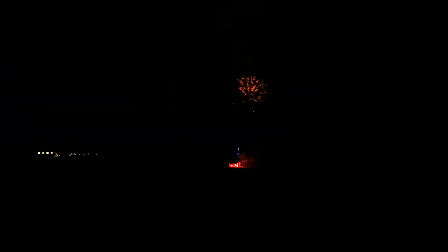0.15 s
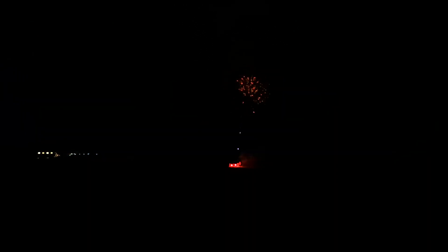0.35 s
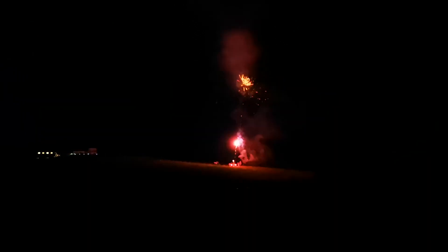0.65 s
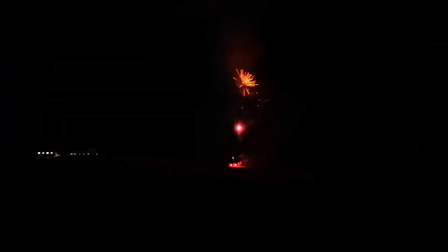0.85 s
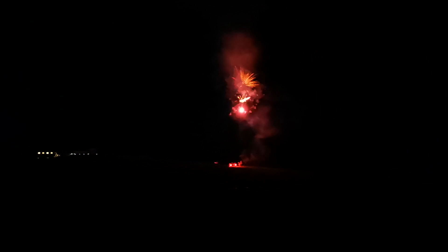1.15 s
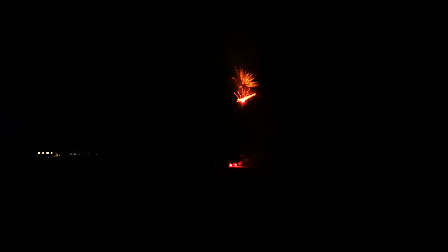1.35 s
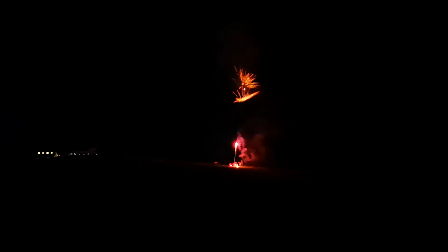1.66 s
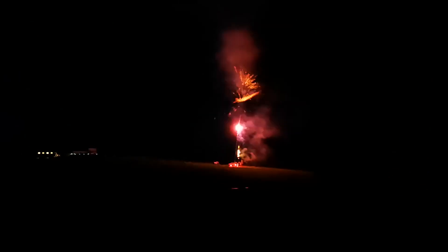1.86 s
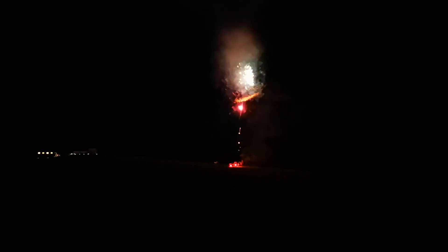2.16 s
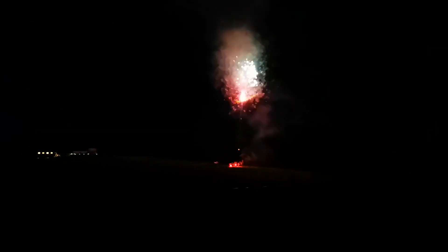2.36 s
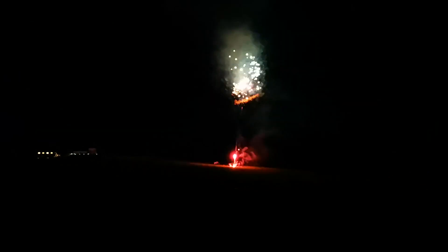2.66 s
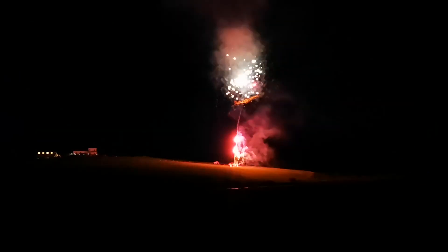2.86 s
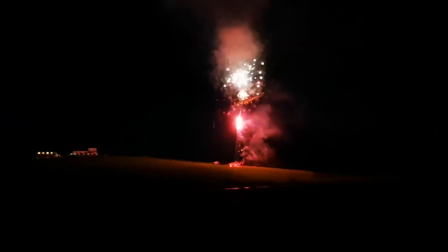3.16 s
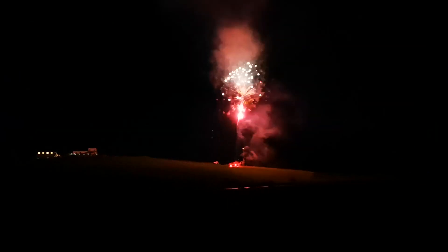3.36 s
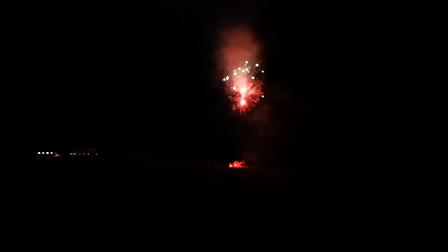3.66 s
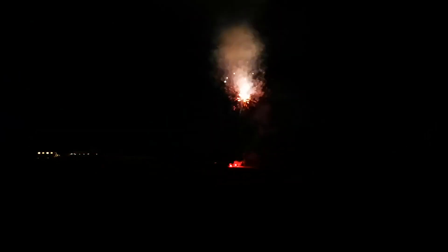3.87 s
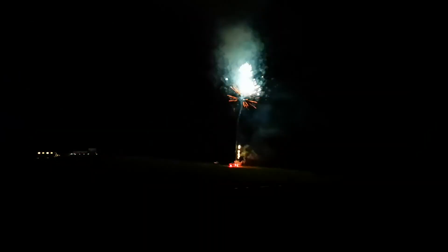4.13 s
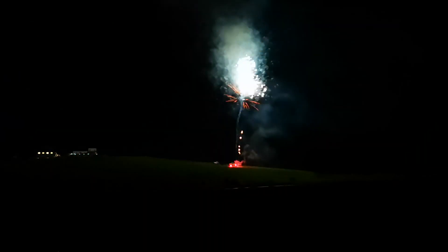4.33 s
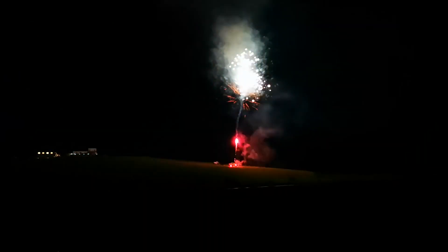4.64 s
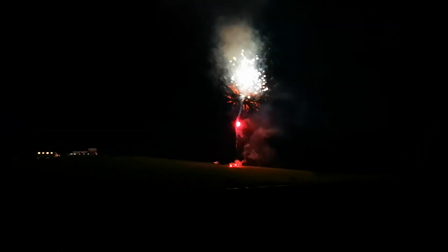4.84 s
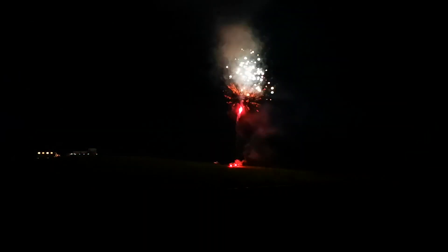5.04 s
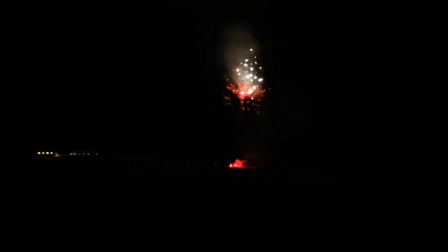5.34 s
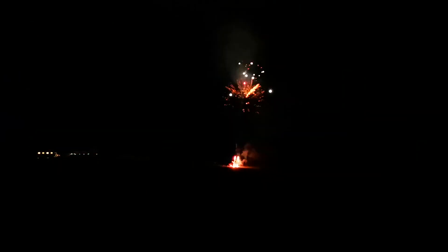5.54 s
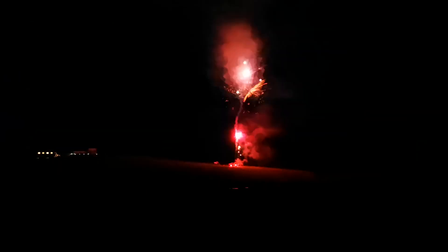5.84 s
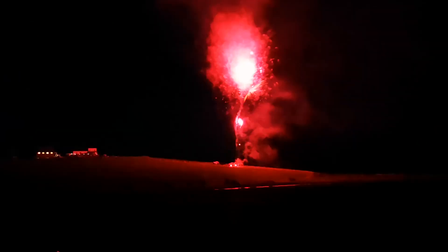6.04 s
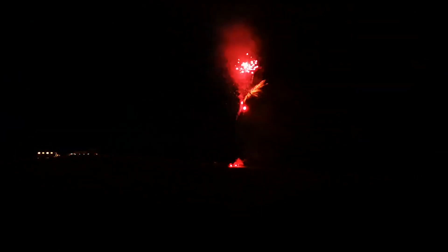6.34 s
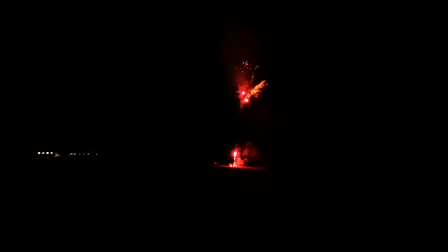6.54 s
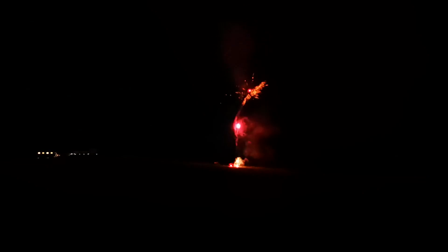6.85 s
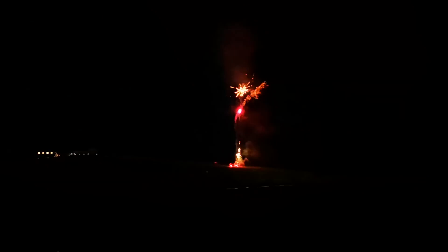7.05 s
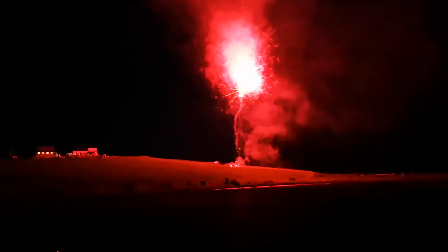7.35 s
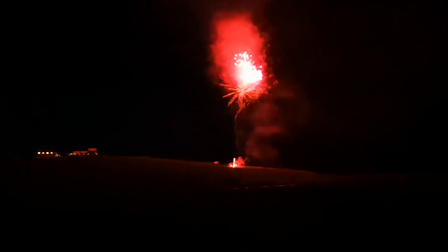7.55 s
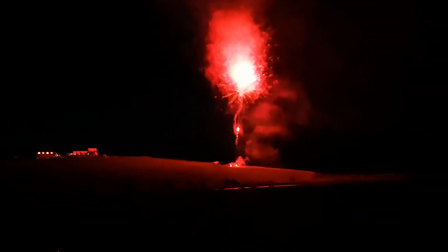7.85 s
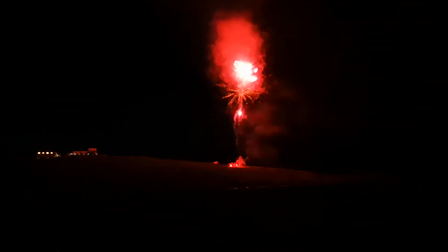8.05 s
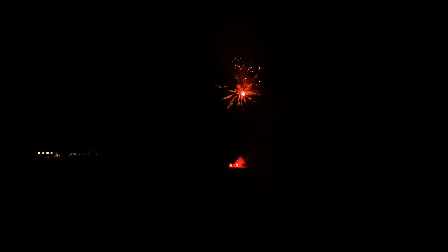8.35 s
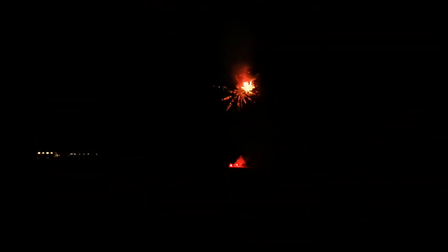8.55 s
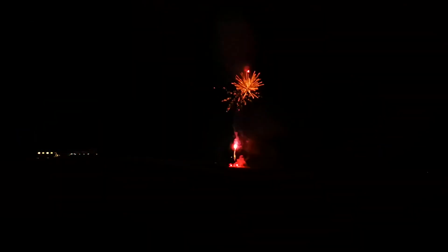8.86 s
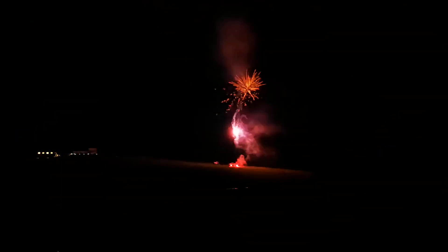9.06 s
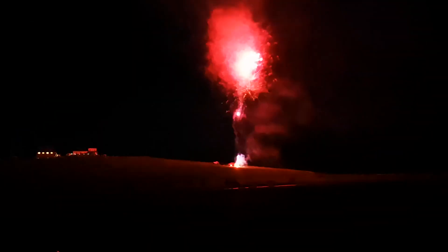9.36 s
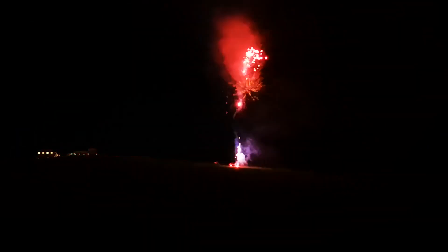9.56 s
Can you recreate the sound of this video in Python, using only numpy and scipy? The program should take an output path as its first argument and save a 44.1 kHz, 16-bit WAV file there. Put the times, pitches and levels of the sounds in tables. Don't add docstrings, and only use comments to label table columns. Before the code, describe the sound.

Irregular hard firework bangs, with short hollow launch thumps between them, ring off trees and far slopes above faint crickets and low night rumble.

```python
import sys
import numpy as np
from scipy import signal
from scipy.io import wavfile

SR = 44100
rng = np.random.default_rng(int(sys.argv[2]) if len(sys.argv) > 2 else 0)


def rack_gain(trim_db):
    fader = np.asarray(trim_db, float)
    return 10 ** (fader / 20)


def file_out(sig):
    cols = np.atleast_2d(sig).T
    lim = np.clip(cols, -1, 1)
    pcm = np.round(lim * 32767).astype(np.int16)
    wavfile.write(sys.argv[1], SR, pcm)


N = 427769
RUN_IN = 3 * SR // 2

# (frequency [Hz], density [dB per Hz])
NIGHT_AIR = [(60, 1.5), (193, -14), (266, -11), (585, -10), (846, -20), (5500, -34.5), (8500, -40),
             (12000, -85)]
# (time [s], level [dB])
CRICKET_CHIRPS = [(-.06, -83), (.257, -80), (.609, -80), (.953, -74.5), (9.01, -77)]
# (time [s], thump [dB], crack [dB], crack ring [Hz], upper ring [dB])
LIFT_CHARGES = [(0.8177, -19.5, -13, 1380, 1), (1.2229, -21, -12, 1490, -5.5),
                (2.277, -15.5, -8.5, 1810, -12), (2.4819, -24, -14.5, 1670, 1.5),
                (3.3798, -22, -17.5, 1532, 2), (3.4781, -16, -13, 1580, -12.5),
                (3.5132, -19, -8.0, 1450, -1), (3.5436, -19, -11.5, 1500, -14),
                (5.2144, -16, -14.5, 1590, -3.5), (6.268, -26, -11.5, 1780, 3),
                (6.297, -20, -12.5, 1530, -4.5), (6.3422, -15.5, -11, 1530, 7),
                (7.2527, -20, -10.5, 1660, 3), (7.6165, -20.5, -14, 1690, 9.5),
                (8.3203, -15, -10.5, 1580, -3.5), (9.4508, -21, -9, 1630, -4.5)]
# (frequency [Hz], level [dB], t60 [s])
TUBE_MODES = [(112, -0.5, 0.044), (53.5, -5.0, 0.073), (108, -15, 0.12)]
# (lag [s], level [dB])
MUZZLE_SLAPS = [
    (.0100, -15),
    (.026, -18.5),
    (0.036, -22),
]
# (time [s], peak [dB], spike width [ms], ground bounce lag [ms], bounce [dB])
SHELL_BURSTS = [(1.2788, -2.3, 0.15, 4.04, -14), (1.8354, -1.5, 0.23, 3.67, -10),
                (2.7283, -1.5, 0.14, 4.52, -15), (3.2824, -0.9, 0.33, 3.71, -9),
                (3.908, -1, 0.19, 3.67, -11.5), (4.6051, -2, 0.17, 3.5, -14.5),
                (4.6733, -4, 0.23, 3.93, -8), (4.7646, -1.5, 0.15, 4.15, -12),
                (5.0568, -0.5, 0.18, 3.76, -11), (6.1302, -2, 0.26, 3.72, -8.5),
                (6.6161, -0.2, 0.18, 4.15, -13), (7.7504, 5, 0.19, 3.87, -8),
                (7.8819, 0.3, 0.18, 4.24, -13.5), (7.9787, -2.2, 0.15, 3.98, -12),
                (8.461, 4.5, 0.14, 4.2, -14), (9.2487, -2, 0.21, 3.8, -8.5)]
# (time [s], strength [dB])
EARLIER_BURSTS = [
    (-1.3, -35.5),
    (-0.91, -40),
]

# (time after bang [s], spread [s], return lift [dB], left-right [dB])
FIELD_REFLECTORS = [
    (0.015, 0.0011, 0, 8.5),
    (0.039, 0.0052, 4, 0),
    (0.141, 0.012, 5, -2),
    (.2, 0.002, 5.5, -1),
    (.3, .05, -1, -3),
    (0.422, 0.038, 1.5, 0),
]
# (frequency [Hz], level [dB], t60 [s])
NEAR_SCATTER = [(66.6, 2, 0.45), (280, 10, 0.32), (926, 10.5, 0.12), (1470, -3, 0.11), (2170, -2.5, 0.13),
                (3370, -7, 0.16), (8800, -19, 0.28), (12700, -43, .07)]
TREE_LINE = [(100, -14.5, 1), (293, -12.5, 0.88), (620, -7, 0.37), (970, -21.5, .94), (1400, -24, 1),
             (3056, -27, 1), (7600, -27.5, 1), (10400, -39.5, 0.4)]
FAR_SLOPES = [(96, -34.5, 2.8), (300, -19.5, 11.2), (860, -15, 6.8), (1314, -26, 4.2), (2140, -23.5, 4.3),
              (4520, -32.5, 2.4), (7600, -43.5, 3.6), (12800, -86, 1.2)]
# (frequency [Hz], left-right [dB])
FAR_BALANCE = [(60, 7), (150, -4.5), (380, 3), (950, 5), (2380, 2.5), (5980, 8), (15000, -11)]
# (frequency [Hz], left-right correlation [-1..1])
PORT_LIKENESS = [(40, .995), (100, .995), (215, .93), (300, .2), (450, -.45), (700, -.65), (1200, -.05),
                 (2000, 0)]
# (frequency [Hz], width [Hz], level [dB])
PORT_RINGS = [(1680, 300, -2.5), (1750, 500, -6.0)]
# (frequency [Hz], width [Hz], left-right [dB])
HOUSING_SHADE = [(2000, 400, 7), (2620, 450, -8), (3700, 700, 5), (5300, 600, -6), (7200, 1500, 12),
                 (11000, 3000, -5)]
# (frequency [Hz], width [Hz], level [dB], boost or cut [signed gain])
EQUALISER = [(1490, 2850, -5, 0.77), (2850, 210, -19, 0.72), (7750, 340, -8, 1), (556, 270, -5.5, -0.81)]


def at_hz(points, hz):
    freq, *columns = np.transpose(points)
    return [np.interp(np.log(hz), np.log(freq), c) for c in columns]


def rms_one(x):
    return x / np.sqrt(np.mean(x ** 2) + 1e-20)


def drift(rate_hz, size):
    r = np.exp(-80 * np.pi * rate_hz / SR)
    slow = signal.lfilter([1], [1, -2 * r, r * r], rng.standard_normal(size // 40 + 2002))[2000:]
    return np.interp(np.arange(size) / 40, np.arange(len(slow)), rms_one(slow))


def resonate(x, hz, width_hz):
    r = np.exp(-np.pi * width_hz / SR)
    zeros = np.array([1, 0, -1]) * (1 - r * r) / 2
    return signal.lfilter(zeros, [1, -2 * r * np.cos(2 * np.pi * hz / SR), r * r], x)


def cut(x, hz, kind, order=2):
    return signal.sosfilt(signal.butter(order, hz, kind, fs=SR, output="sos"), x)


def add(out, time_s, x):
    i = round(time_s * SR) + RUN_IN
    out[..., i:i + x.shape[-1]] += x[..., :out.shape[-1] - i]


def bands(size, density=1):
    edges_hz = 25 * 2 ** np.arange(0, 9.5, .4)
    white = rng.standard_normal((2, 2, size + 4000))
    white = white * (rng.random(size + 4000) < density) / np.sqrt(density)
    for k, (low, high) in enumerate(zip(edges_hz, edges_hz[1:])):
        mid, side = cut(white[k % 2], [low, high], "band")[:, 4000:]
        hz = np.sqrt(low * high)
        alike = np.clip(at_hz(PORT_LIKENESS, hz)[0], -1, 1)
        yield hz, np.sqrt(1 + alike) * mid + np.sqrt(1 - alike) * side * [[1], [-1]]


def strength(peak_db, width_ms, lag_ms):
    return -35.5 + 19 * (width_ms - .18) + 0.25 * peak_db - 3 * (lag_ms - 3.9)


def field(seconds, trees_db, far_db):
    trees_start_s, trees_end_s = 0.063, 0.095
    t = np.arange(round(seconds * SR)) / SR
    sides = np.array([[1], [-1]])
    lumps = rack_gain(0.75 * drift(32, len(t))) * np.ones((2, 1))
    for lag_s, spread_s, lift_db, pan_db in FIELD_REFLECTORS:
        lumps = lumps * rack_gain(np.exp(-((t - lag_s) / spread_s) ** 2) * (lift_db + pan_db / 2 * sides))
    rise = np.clip(t / trees_start_s, 0, 1) ** 2
    density = np.clip(.12 + 3 * np.arange(-4000, len(t)) / SR, .12, 1)
    out = 0
    for hz, noise in bands(len(t), density):
        near, near_t60 = at_hz(NEAR_SCATTER, hz)
        trees, trees_t60 = at_hz(TREE_LINE, hz)
        far, far_t60 = at_hz(FAR_SLOPES, hz)
        left_db = at_hz(FAR_BALANCE, hz)[0] / 2 * sides
        power = np.clip(t / 0.0011, 0, 1) * rack_gain(2 * (near - 60 * t / near_t60))
        power = power + rise * rack_gain(2 * (trees + trees_db - 60 * np.maximum(t - trees_end_s, 0) / trees_t60))
        power = power + rise * rack_gain(2 * (far + far_db + left_db - 60 * t / far_t60))
        out = out + noise * np.sqrt(power) * rack_gain(3.0 * drift(10, len(t)))
    return out * lumps * np.clip((seconds - t) / 0.37, 0, 1)


def night():
    air_db, rest_db, burst_db, lift_db = -62 - 1.5, -64.5, -19, -41
    rise_s, t60_s = 0.11, 2.5
    air = sum(rack_gain(at_hz(NIGHT_AIR, hz)[0] + 0.64 * drift(3.2, N)) * noise for hz, noise in bands(N))
    bangs = [(row[0], strength(*row[1:4]) + burst_db) for row in SHELL_BURSTS]
    bangs += [(row[0], row[1] + lift_db) for row in LIFT_CHARGES]
    power = rack_gain(2 * rest_db)
    for time_s, db in bangs:
        since_s = np.maximum(np.arange(N) / SR - time_s, 0)
        power = power + (1 - np.exp(-since_s / rise_s)) * rack_gain(2 * (db - 60 * since_s / t60_s))
    rumble = rms_one(resonate(cut(rng.standard_normal(N), 152, "low"), 64, 19))
    return rack_gain(air_db) * rms_one(air) + np.sqrt(power) * rack_gain(2.4 * drift(3.5, N)) * rumble


def crickets():
    out = np.zeros(N + RUN_IN)
    t = np.arange(round(.1 * SR)) / SR
    pulses = np.clip(np.sin(2 * np.pi * 80.5 * t) + .3, 0, 1)
    pulses = pulses * np.clip(t / .025 + .3, 0, 1) * np.clip((.087 - t) / .006, 0, 1)
    for time_s, db in CRICKET_CHIRPS:
        wander_rad = np.cumsum(rng.normal(0, 0.059, len(t)))
        add(out, time_s, rack_gain(db + 2.0) * pulses * np.sin(2 * np.pi * 7180 * t + wander_rad))
    chorus = resonate(resonate(rng.standard_normal((2, N + RUN_IN)), 5260, 600), 5260, 650)
    chorus = rack_gain(-83 + 1.5 * drift(70, N + RUN_IN)) * rms_one(chorus)
    return out * rack_gain([[2.5], [-2.5]]) + chorus


def tube_boom():
    t = np.arange(6000) / SR
    boom = 0
    for k, (hz, db, t60_s) in enumerate(TUBE_MODES):
        boom = boom + (-1) ** k * rack_gain(db - 60 * t / t60_s) * np.sin(2 * np.pi * hz * t)
    return cut(boom * (1 - np.exp(-t / 0.0019)), 155, "low", order=3)


def muzzle_crack(crack_db, ring_hz, upper_db):
    draw = rng.standard_normal((3, 1500))
    jet = (draw[0] + 0.48 * draw[1:]) * rack_gain(-60 * np.arange(1500) / SR / 0.019)
    jet[:, 2] += 10.0
    third_hz = 2080 if ring_hz < 1800 else 1480
    ring = rms_one(resonate(jet, ring_hz, 280))
    ring = ring + rack_gain(upper_db) * rms_one(resonate(jet, 2840, 320))
    ring = ring + rack_gain(-8.0) * rms_one(resonate(jet, third_hz, 140))
    ring = ring + rack_gain(-6.5) * rms_one(cut(jet, 3800, "high"))
    ring[:, :8] += rack_gain(5.5) * np.hanning(8)
    ring = cut(cut(ring, 1300, "high", order=3), 8030, "low", order=10)
    return rack_gain(crack_db - 4.5) * ring / np.abs(ring).max()


def lifts():
    boom_lead_s = .0032
    booms, fronts = np.zeros(N + RUN_IN), np.zeros(N + RUN_IN)
    cracks = np.zeros((2, N + RUN_IN))
    boom = tube_boom()
    for time_s, thump_db, crack_db, ring_hz, upper_db in LIFT_CHARGES:
        add(booms, time_s - boom_lead_s, rack_gain(thump_db + 4.0) * boom)
        crack = muzzle_crack(crack_db, ring_hz, upper_db)
        add(cracks, time_s - 2e-4, crack)
        add(fronts, time_s, rack_gain([crack_db]))
        chances_db = rng.normal(0, 2.5, (len(MUZZLE_SLAPS), 2, 1))
        for (lag_s, slap_db), chance_db in zip(MUZZLE_SLAPS, chances_db):
            slap = rack_gain(slap_db + chance_db) * cut(crack, 3500 - 40000 * lag_s, "low", order=3)
            add(cracks, time_s + lag_s * rack_gain(chance_db[0, 0] / 5), slap)
    sent = rack_gain(-54.5) * booms + rack_gain(-48) * cracks + rack_gain(-22) * cut(fronts, [1200, 3800], "band")
    wet = signal.fftconvolve(sent, field(0.94, -4.0, -12.0), axes=1)[:, :N + RUN_IN]
    puff = rack_gain(11) * cut(fronts, [190, 480], "band")
    return booms + cracks + puff + wet


def blast(width_ms):
    t = np.arange(600) / SR
    x = t / (0.0034 * width_ms)
    slow = t / 0.0019
    suction = rack_gain(-14.0) * slow ** 2 * np.exp(-2 * slow) * (2.6 - slow)
    return (1 - x) * np.exp(-1.3 * x) - suction


def bursts():
    out, clicks = np.zeros((2, N + RUN_IN)), np.zeros((2, N + RUN_IN))
    fade = rack_gain(-60 * np.arange(900) / SR / 0.02)
    sources = []
    for time_s, peak_db, width_ms, lag_ms, bounce_db in SHELL_BURSTS:
        wave = blast(width_ms)
        strength_db = strength(peak_db, width_ms, lag_ms)
        sources.append((time_s, strength_db))
        over_db = max(0, 0.29 * (strength_db + 45.0))
        direct = cut(wave, 7950 * (0.24 / width_ms) ** 0.72, "low", order=4)
        add(out, time_s - 2.5e-4, rack_gain(peak_db + over_db + 0.7) * direct)
        bounce = rack_gain(bounce_db + 5 + np.array([[-1.2], [1.2]])) * cut(wave, 2180, "low")
        add(out, time_s - 3.5e-4 + lag_ms / 1000, bounce)
        wall_s = .023 + .009 * max(0, lag_ms - 3.7)
        add(out, time_s + wall_s, rack_gain(strength_db + 17) * cut(wave, [500, 2200], "band"))
        fragments = cut(rng.standard_normal((2, 900)), [1200, 8000], "band", order=4)
        add(out, time_s, rack_gain(-24.5) * fade * fragments)
    for time_s, strength_db in sources + EARLIER_BURSTS:
        turn_rad = rng.uniform(-0.91, 0.84)
        add(clicks, time_s, rack_gain(strength_db + 10.0) * np.array([[np.cos(turn_rad)], [np.sin(turn_rad)]]))
    for train in clicks:
        out += signal.fftconvolve(train[None], field(2.4, 0, 0), axes=1)[:, :N + RUN_IN]
    return out


def scene():
    return night() + (crickets() + lifts() + bursts())[:, RUN_IN:]


def band_limit(x):
    return signal.sosfilt(signal.butter(12, 16550, fs=SR, output="sos"), x)


def record(dry):
    x = np.array([ch + rack_gain(db) * resonate(ch, hz, width_hz) for ch, (hz, width_hz, db) in zip(dry, PORT_RINGS)])
    x[0] = np.append(0, x[0, :-1])
    for hz, width_hz, db in HOUSING_SHADE:
        x = x + (rack_gain([[db / 2], [-db / 2]]) - 1) * resonate(x, hz, width_hz)
    flat = x
    for hz, width_hz, db, sign in EQUALISER:
        backward = resonate(flat, hz, width_hz)[:, ::-1]
        x = x + sign * rack_gain(db) * resonate(backward, hz, width_hz)[:, ::-1]
    x = 1.015 * np.tanh(x / 0.99)
    body = signal.sosfiltfilt(signal.butter(4, 8600, fs=SR, output="sos"), x)
    x = body + rack_gain(-7.5) * cut(x - body, 13300, "low")
    hiss = cut(cut(rng.standard_normal((2, N)), 9000, "high"), 15600, "low", order=12)
    mix = np.clip(x + rack_gain(-79.0) * hiss, -1, 1)
    return band_limit(mix)


dry = scene()
out = record(dry)
file_out(out)
```